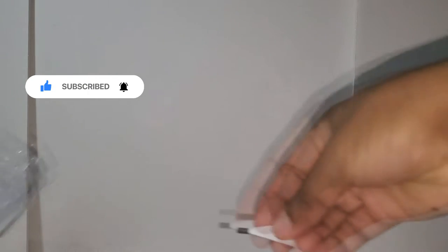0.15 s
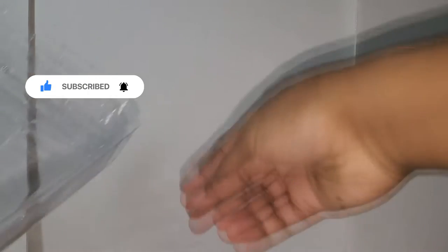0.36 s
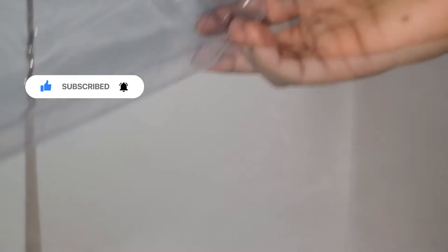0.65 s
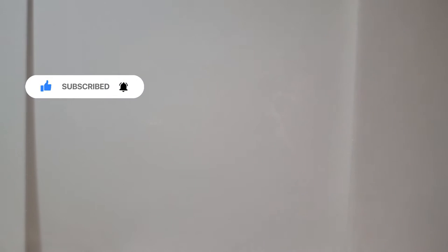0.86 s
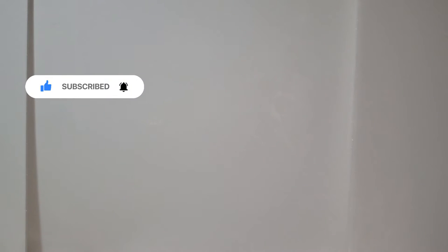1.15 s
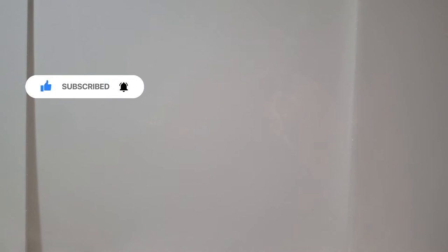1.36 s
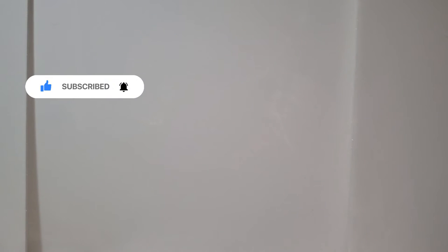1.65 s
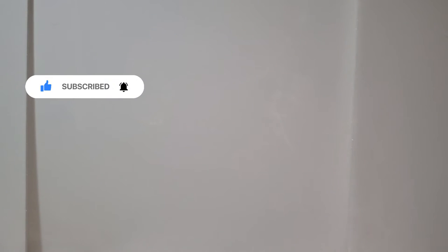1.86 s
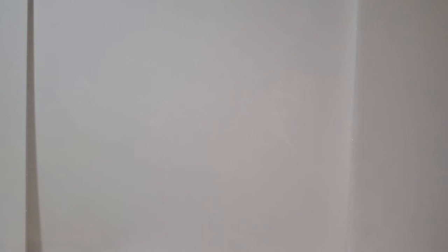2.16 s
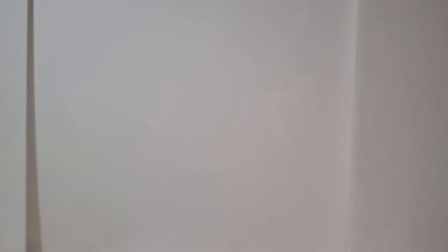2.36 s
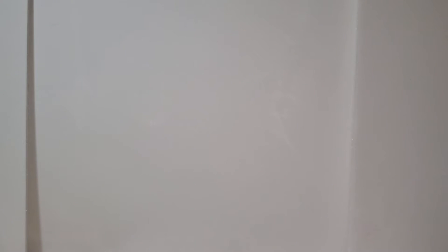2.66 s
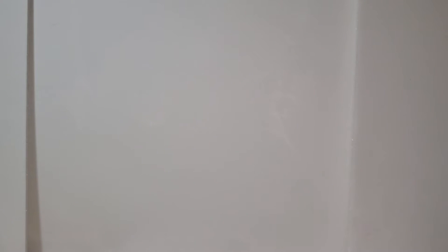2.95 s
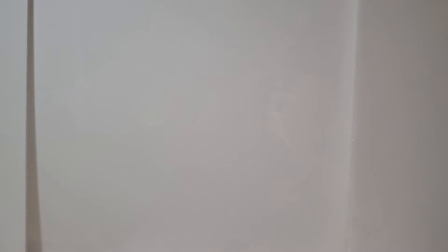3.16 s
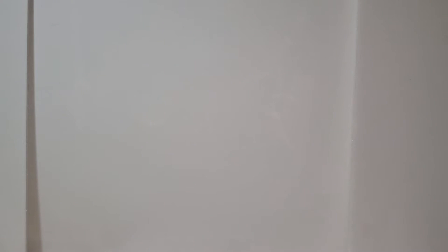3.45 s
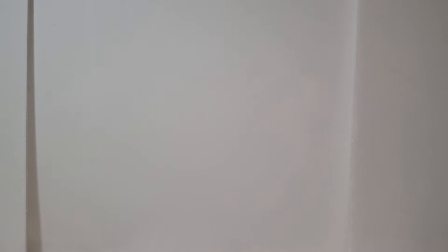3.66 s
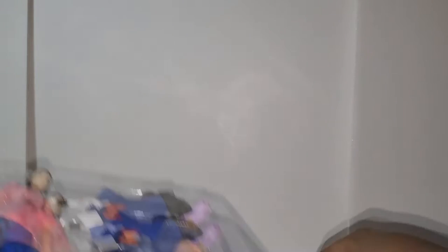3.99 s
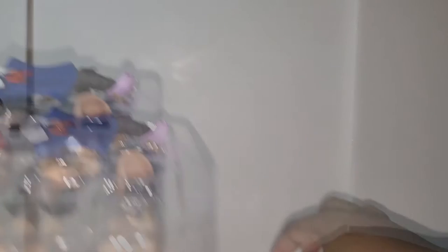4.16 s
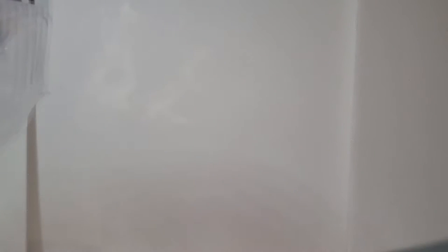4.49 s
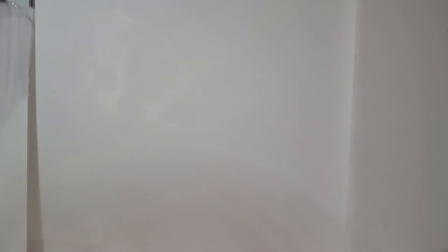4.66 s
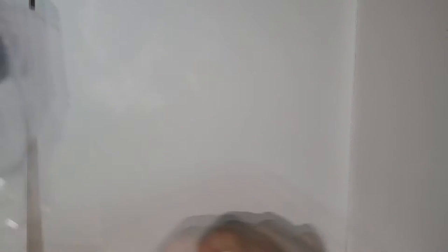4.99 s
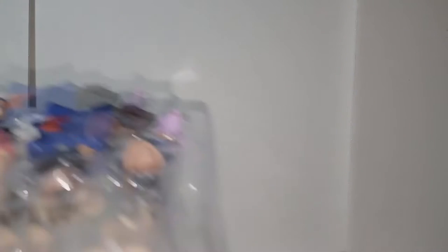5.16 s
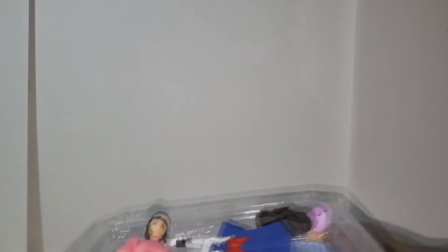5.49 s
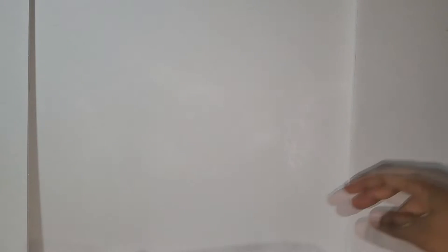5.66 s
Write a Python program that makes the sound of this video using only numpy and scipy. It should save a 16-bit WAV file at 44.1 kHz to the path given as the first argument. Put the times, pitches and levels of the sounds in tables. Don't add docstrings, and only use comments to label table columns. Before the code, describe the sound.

Thin hard plastic packaging cracks, pops and crinkles in bursts with quiet gaps, light tinkles and dull thumps, above an indoor hum.

```python
import sys
import numpy as np
from scipy import signal
from scipy.fft import rfft, irfft, next_fast_len
from scipy.io import wavfile
from scipy.ndimage import uniform_filter1d, map_coordinates

SR = 44100
rng = np.random.default_rng(int(sys.argv[2]) if len(sys.argv) > 2 else 0)


def master_out(mix):
    frames = np.transpose(np.atleast_2d(mix))
    ceiling = np.clip(frames, -1, 1)
    pcm = np.round(ceiling * 32767).astype(np.int16)
    wavfile.write(sys.argv[1], SR, pcm)


def invert_db(x):
    u = np.asarray(x, float) / 20
    return 10 ** u


N = 257103

# (low edge [Hz], high edge [Hz], t60 [s])
PARTS = [
    (2142, 5760, 0.049),
    (534, 1420, 0.047),
    (4900, 6700, 0.016),
    (137.7, 326, 0.051),
]
PART_LIKENESS = [
    0.066,
    0.81,
    0.047,
    0.92,
]


def unit(x):
    return x / np.sqrt(np.mean(x ** 2) + 1e-20)


def along(points, hz):
    f, v = np.transpose(points)
    return np.interp(np.log(hz + 1), np.log(f + 1), v)


def curves(rows):
    s, *cols = np.transpose(rows)
    return np.array([np.interp(np.arange(N) / SR, s, c) for c in cols])


def filtered(x, response):
    m = next_fast_len(N + 8192)
    hz = np.fft.rfftfreq(m, 1 / SR)
    return irfft(rfft(x, m) * response(hz), m)[..., :N]


def wobble(rate):
    knots = rng.standard_normal(int(N * rate / SR) + 4)
    return map_coordinates(knots, [np.arange(N) * rate / SR])


def ports(x, alike):
    turn = np.arccos(np.clip(alike, -1, 1)) / 2
    mid, side = x[0] * np.cos(turn), x[1] * np.sin(turn)
    return np.array([mid + side, mid - side])


def tray():
    drive = snaps() + clicks() + crumple()
    out = 0
    for d, (lo_hz, hi_hz, _) in zip(drive, PARTS):
        out = out + signal.fftconvolve(d, part_filter(lo_hz, hi_hz)[None], axes=1)[:, :N]
    return out


def snaps():
    # (time [s], peak level [dB], body over the peak [dB], length factor [1])
    rim_ticks = [(0.5805, -35.5, 2, 0.6), (0.7871, -24.5, 8, 1.2), (0.8, -12.5, -9.5, 0.69),
                 (0.9143, -44.5, 5, 1.2), (0.9353, -46, -2, 6.7), (1.0222, -31.5, 0, 0.5),
                 (1.0325, -29, -9, 0.64), (1.4364, -39, 4, 3.1), (1.444, -30.5, 9, 2.5),
                 (1.4582, -20, -6, 1.4), (1.6095, -28, 7.5, 1.65), (1.6885, -29.5, -6, 1.05),
                 (1.7185, -38, 4, 1.5), (1.733, -43.5, -3, 0.79), (1.4915, -45, -7, 1.1),
                 (1.7824, -53, 22, 1.26), (1.8193, -55, 11, 2.1), (2.0271, -46.5, 5.5, 2.1),
                 (2.0475, -23.5, -5, 1.1), (2.139, -30.5, -18, 1), (2.2118, -21.5, -17, 1.2),
                 (2.2626, -22.5, -1, 1.3), (2.272, -28, -5, 1.2), (2.39, -33, -1, 1), (2.43, -33, -12, 1.5),
                 (3.575, -28, -5, .8), (2.399, -40.5, -10, 1), (2.4605, -25, -2, 1.9),
                 (2.5075, -25.5, -17, 1.8), (3.5229, -25, -5, 1.9), (3.5324, -28, -13, 0.52),
                 (3.5922, -32, 7, 0.68), (3.6235, -26.5, -7, 0.9), (3.6385, -16, -1, 0.76),
                 (3.6474, -27.5, -8, 2.4), (4.0444, -44, 13, 0.4), (4.6124, -42.5, -12, 1.5),
                 (4.618, -55.5, -12, 1.1), (4.7915, -36.5, 1.5, 2.4), (5.2058, -29.5, -12, 0.52),
                 (5.2648, -24.5, -1, 0.86), (5.3372, -30.5, -15, 0.63), (5.3485, -35, -12, 1.9),
                 (5.4274, -35.5, 24, 0.52), (5.482, -36.5, -10, 0.49)]
    rib_cracks = [(0.3865, -5.5, -15, 0.24), (0.3905, -7.5, -16, 1.7), (0.4215, -2.5, -31, 0.56),
                  (0.6348, -51, 20.5, 2.3), (0.7401, -46, 14.5, 1.1), (0.7475, -34.5, 5, 0.52),
                  (0.8744, -52, 15, 1.3), (1.0214, -26, 2.5, 0.68), (1.0297, -19, -9.5, 0.41),
                  (1.4907, -31, 1.5, 1.9), (1.6317, -32, 5.5, 1.5), (1.716, -36, 8.5, 1.4),
                  (2.2744, -27.5, 11, 2.03), (2.5825, -24, -6.5, 1.6), (2.6305, -31.5, -3, 0.47),
                  (2.29, -26, 11, 1.44), (3.4865, -30.5, -8.5, 0.92), (3.516, -32, 10.5, 0.89),
                  (3.6012, -29.5, 6.5, 2.2), (3.628, -17.5, -5, 0.18), (3.7108, -24, -10, 0.44),
                  (3.7345, -22, 12, 0.48), (3.744, -16.5, 12, 1.44), (3.835, -39.5, 9, 0.85),
                  (4.041, -35.5, -3, 0.87), (4.108, -44, 6.5, 0.74), (4.1235, -37, -9, .8),
                  (4.0089, -31, -12, 1.4), (4.0764, -18.5, -19, 0.39), (4.079, -17, -4, 0.48),
                  (4.0892, -27, 3, 0.52), (4.8226, -45, -9, 1.46), (5.0669, -35, 7, 3.3),
                  (5.136, -31, -7, 0.94), (5.2923, -35.5, -6, 0.91), (5.392, -35, 6, 1),
                  (5.1811, -27, 2, 1.3), (5.2166, -16, -26, 0.54), (5.226, -16, -12, 1.1),
                  (5.235, -22, -4, 0.48), (5.245, -29.5, -5, 0.52), (5.378, -33, -16, 0.95),
                  (5.5151, -27, 11.5, 2.6), (5.5323, -22, 9, 1.44), (5.6435, -34.5, 15.5, 0.42),
                  (5.6481, -27.5, 7, 2), (5.711, -38, -5, 1), (5.7294, -30.5, -6, 0.81),
                  (5.743, -24, 0, 1.4)]
    face_pops = [(0.4325, -20, 1, 0.53), (0.4624, -31, 10.5, 3.2), (0.7996, -21, -3, 0.76),
                 (0.7785, -33.5, -5, 0.75), (1.5287, -35.5, 6.5, 2.5), (1.7549, -46, -6, 0.63),
                 (2.0345, -30.5, 12, 2.1), (2.168, -27, 11, 2.6), (2.3321, -39, -12, 1.5),
                 (2.377, -26, -6, 0.36), (2.4274, -46, -25, 2.7), (2.4483, -25.5, -8, 2.2),
                 (2.4605, -32, -48, 3.7), (3.5454, -27.5, 0, 0.84), (3.6765, -27.5, 7, 1.6),
                 (3.664, -29.5, 20, 2), (3.692, -40, 0, 0.66), (2.609, -25, 6, 1.6),
                 (2.5345, -30.5, 4, 2.1), (5.69, -32.5, 3, 0.63), (5.459, -31, -5, 0.67),
                 (5.766, -31, 7, 1.4), (5.81, -35, -1, 1.4), (5.3135, -37.5, 6, 1.7), (3.8562, -35, 0, 1.1),
                 (3.926, -37.5, 4.5, 0.69), (3.9766, -39.5, 8, 0.36), (4.6745, -41, 18, 1.47),
                 (4.7203, -43.5, 18, 2.6), (4.738, -50, 14, 1.5), (4.765, -56, 17.5, 2.4),
                 (4.78, -45.5, 12.5, 0.8), (5.1032, -30.5, -1, 2), (5.112, -31, 10.5, 2.2),
                 (5.16, -47, 8, 2.7), (5.442, -23.5, 16.5, 1.94), (5.6824, -30, 9, 1.5),
                 (5.7533, -23, 13, 2), (5.7872, -16.5, -17, 1.3), (5.797, -27.5, 2, 2.4)]
    kinds = ((rim_ticks, 1.5), (rib_cracks, -19), (face_pops, -28))
    rise_factor = (0.13, 4.4, 0.5, 6.4)
    crack_share = (1.0, 0.39, 0.6, 0.05)
    drive = np.zeros((4, 2, N + SR))
    t = np.arange(SR // 8) / SR
    noise = patchy(3)
    crack = 1.6 * invert_db(-60 * t / 0.011)
    for rows, edge_db in kinds:
        for s, db, body_db, length in rows:
            at = round(s * SR)
            piece = noise[:, at:at + len(t)]
            burst = piece / np.std(piece[:, :200])
            for k, rel_db in enumerate((0, body_db, edge_db, body_db - 11.0)):
                t60 = PARTS[k][2] * np.clip(length, 0.2, 4)
                fall = invert_db(db + rel_db - 9.0 - 60 * t / t60)
                rise_s = 0.00041 * length ** 2 * rise_factor[k]
                rise = 1 - np.exp(-(t + 1 / SR) / rise_s)
                envelope = (rise + crack * crack_share[k]) * fall
                drive[k, :, at:at + len(t)] += envelope * ports(burst, PART_LIKENESS[k])
    return drive[..., :N]


def clicks():
    # (time [s], level [dB])
    creases = [(0.385, -21), (0.3905, -15), (0.4216, -12), (0.424, -8), (5.7545, -13), (5.104, -24),
               (2.036, -17), (2.4645, -22), (0.8, -11), (1.0305, -20.5), (2.04, -27), (2.2635, -20),
               (2.0855, -29), (2.107, -28), (2.54, -32), (3.736, -29), (3.745, -21), (5.445, -23),
               (5.6495, -36), (5.767, -12.5), (5.4298, -21), (5.2495, -27), (1.4573, -23), (2.0467, -31.5),
               (2.093, -19), (2.1724, -22), (2.292, -24), (2.3044, -25), (2.379, -27.5), (2.452, -15),
               (2.512, -30), (2.585, -19), (2.2735, -17), (3.525, -34), (3.6245, -9), (3.639, -27),
               (5.1825, -15), (5.2063, -12), (5.2158, -9.5), (5.2656, -22), (5.4417, -16), (5.5385, -31),
               (5.6824, -28), (5.7875, -7)]
    over_click = [
        3.5,
        -11.5,
        -13,
    ]
    drive = np.zeros((4, 2, N))
    s, db = np.transpose(creases)
    at = np.round(s * SR).astype(int)
    drive[:3, :, at] = invert_db(db + np.array(over_click)[:, None])[:, None]
    return drive


def crumple():
    # (fullest at [s], crackle level [dB], build-up [s], hold [s], depth of the bend [dB])
    pinches = [(0.577, -65.5, 0.0015, 0.0035, 19), (0.796, -39.5, 0.0024, .004, 8),
               (1.022, -38, 0.016, 0.024, 2.5), (1.4565, -37.5, 0.001, 0.015, 2.5),
               (1.609, -45, .001, 0.007, -11), (1.705, -58, 0.039, 0.0089, 18.5),
               (2.03, -43, 0.005, 0.058, 8), (2.256, -34.5, 0.0018, 0.057, -2),
               (2.445, -36.5, 0.0028, 0.096, -1.5), (3.508, -43, 0.018, 0.025, -9),
               (3.646, -44, 0.034, 0.031, 12), (3.85, -62.5, 0.011, 0.11, 10),
               (4.074, -32.5, 0.003, 0.0019, 0), (4.622, -53, 0.024, 0.088, 5),
               (4.784, -64.5, 0.018, 0.015, 15), (5.223, -38, 0.0067, 0.0019, -4),
               (5.294, -52.5, 0.018, 0.094, 6), (5.505, -50, 0.017, 0.017, 18.5)]
    bends = [(0.386, -26, 0.0006, 0.0023, 13), (0.421, -37, 0.0024, .003, 18.5),
             (0.739, -54, 0.0018, 0.0036, 17), (2.075, -33, .04, 0.071, -10),
             (2.17, -36.5, 0.049, .05, -12), (2.231, -34.5, .02, 0.02, -13), (2.32, -33, .01, .02, -11),
             (2.35, -39, 0.028, 0.25, -0.5), (2.549, -36.5, 0.017, 0.088, -1),
             (3.485, -41, 0.0034, 0.022, -5.5), (3.702, -37.5, 0.11, 0.067, -2),
             (3.796, -41, 0.084, 0.024, 3.5), (4.009, -49, 0.01, 0.066, -2), (4.744, -49.5, 0.068, .02, 9),
             (5.107, -49.5, 0.069, 0.041, 9), (5.207, -39.5, 0.025, 0.0025, -10),
             (5.33, -53, 0.037, .07, 6.5), (5.44, -32.5, 0.04, 0.015, -1.5), (5.469, -37.5, .01, .02, -5),
             (5.59, -58, 0.033, 0.056, 18.5), (5.68, -48, 0.046, 0.0075, 18.5),
             (5.762, -28.5, 0.042, 0.017, 1), (5.788, -35, 0.01, 0.0073, 12), (5.82, -35, .01, .01, 0.5)]
    levels = [squeeze(*row, edge_db=10.5) for row in pinches]
    levels += [squeeze(*row, edge_db=-4) for row in bends]
    level = np.max(levels, axis=0)

    struck = rng.random((5, N)) < 800 / SR
    grains = struck * invert_db(np.minimum(2.5 * rng.exponential(1, (5, N)), 7))
    grain_s = 0.0017
    swell = signal.lfilter([1], [1, -np.exp(-1 / (grain_s * SR))], grains[0] + 1.9 * grains[1:])
    swell[3] = uniform_filter1d(swell[3], size=SR // 30)
    noise = patchy(2.5)[:, :N]
    out = []
    for db, g, alike in zip(level, swell, PART_LIKENESS):
        out.append(invert_db(db - 2.0) * unit(0.26 + unit(g)) * ports(noise, alike))
    return np.array(out)


def squeeze(s, db, build_s, hold_s, depth_db, edge_db):
    # (level over a medium crackle [dB], share of the bend's depth [1], slope [dB per dB of crackle])
    follow = [
        (-0.5, 0.85, 0.454),
        (-11.5, 0.15, -0.1367),
        (1, 0.18, -0.2835),
    ]
    build_db, rest_db, settle_s, medium_db = 12, -81.5, 0.1, -45
    t = np.arange(N) / SR - s
    fall = rest_db + (db - rest_db) * np.exp(-np.maximum(t - hold_s, 0) / settle_s)
    build = build_db * np.minimum(t, 0) / max(build_s, 1 / SR)
    level = np.maximum(fall + build, rest_db)
    body, edge, thud = [level + over + share * depth_db + slope * (level - medium_db)
                        for over, share, slope in follow]
    active = (t > -build_s) & (t < hold_s + 2 * settle_s)
    return np.where(active, [level, body, edge + edge_db, thud], -150)


def patchy(depth_db):
    z = signal.stft(rng.standard_normal((2, N + SR)), nperseg=512)[2]
    field = rng.standard_normal(z.shape[1:])
    for axis in (0, 1):
        field = uniform_filter1d(field, size=3, axis=axis)
    return unit(signal.istft(z * invert_db(depth_db * unit(field)), nperseg=512)[1])


def part_filter(lo_hz, hi_hz):
    # (frequency [Hz], level per Hz [dB])
    sheet_colour = [(76, -28.5), (130, -7.5), (238, 2), (378, -0.5), (706, 0), (1190, -5.5), (1290, -6.5),
                    (1460, 1), (7150, -14.5), (9670, -9), (16000, -14)]
    # (centre [Hz], width [Hz], level [dB])
    panels = [(640, 9.9, 3.5), (795, 26, 3.5), (1170, 420, 7), (1445, 42, -1), (2320, 30, -6),
              (3210, 200, 2.5), (3833, 150, 3.5)]
    hz = np.fft.rfftfreq(4096, 1 / SR)
    colour_db = along(sheet_colour, hz)
    for centre_hz, width_hz, db in panels:
        colour_db = colour_db + db / (1 + (2 * (hz - centre_hz) / width_hz) ** 2)
    band = np.sqrt((1 + (lo_hz / (hz + 1)) ** 6) * (1 + (hz / hi_hz) ** 6))
    cep = irfft(np.log(invert_db(colour_db) / band + 1e-6))
    cep[1:2048] *= 2
    cep[2049:] = 0
    h = irfft(np.exp(rfft(cep)))[:2048]
    return h / np.linalg.norm(h)


def tinkle():
    # (time [s], peak level [dB])
    knocks = [(4.728, -33), (4.7431, -24.5), (4.7761, -36), (4.801, -38)]
    # (frequency [Hz], level [dB], t60 [s])
    modes = [(3910, -4.5, 0.061), (5140, -14, 0.038), (2250, -29, 0.035), (7600, -45, 0.03)]
    # (time [s], frequency [Hz], level [dB], t60 [s])
    second_part = [(0.035, 1150, -43, 0.046), (4.613, 5750, -35, 0.04), (4.616, 4900, -38, .02),
                   (4.638, 5750, -43, .04), (4.679, 3750, -49, .05), (4.722, 3350, -47, .05),
                   (4.614, 800, -44, .08), (4.618, 10300, -37, 0.03), (4.614, 2140, -37, 0.04),
                   (4.724, 4800, -43, .05), (4.742, 5700, -43, .03), (4.742, 7300, -48, .05),
                   (4.822, 5350, -45, 0.04)]
    face_rings = [(0.3895, 1070, -7, 0.047), (0.3895, 602, -17, 0.078), (0.398, 1188, -15, 0.063),
                  (0.4215, 1420, -18, 0.026), (0.431, 1140, -11.5, 0.028), (0.46, 606, -30, 0.079),
                  (0.8003, 4140, -16, 0.008), (3.547, 3440, -27, 0.013), (5.483, 3917, -33.5, .015),
                  (0.8003, 4970, -12, .01), (0.7993, 6460, -18, 0.0075), (1.458, 1267, -26, 0.026),
                  (1.458, 8700, -28, 0.022), (2.036, 1178, -20, 0.039), (2.155, 2270, -35, 0.05),
                  (2.6523, 3330, -36, .03), (3.74, 1174, -24, 0.11), (4.0765, 999, -11.5, 0.008),
                  (4.7927, 10060, -48, 0.074), (5.222, 3210, -17.5, 0.018), (5.312, 790, -37.5, 0.05),
                  (5.378, 680, -36.5, 0.099), (5.412, 795, -32, 0.11), (5.442, 1570, -10, 0.0098),
                  (5.5596, 1720, -26, 0.016), (5.683, 1820, -11.5, 0.0062), (5.765, 710, -14.5, 0.035),
                  (5.823, 2200, -14, 0.0085)]
    out, t = np.zeros(N + SR), np.arange(SR // 5) / SR
    rings = [(s, hz, db + level, t60) for s, db in knocks for hz, level, t60 in modes]
    for s, hz, db, t60 in rings + second_part + face_rings:
        envelope = invert_db(db + 2.5 - 60 * t / t60) * (1 - np.exp(-t / 0.0006))
        out[round(s * SR):][:len(t)] += envelope * np.sin(2 * np.pi * hz * t)
    return out[:N]


def thumps():
    # (time [s], peak level [dB], frequency [Hz], t60 [s])
    table_hits = [(0.806, -29, 169, 0.37), (1.022, -33, 684, 0.14), (1.025, -30.5, 900, 0.087),
                  (1.486, -32.5, 309, 0.069), (2.263, -32, 338, 0.2), (2.285, -30, 567, 0.069),
                  (2.59, -28.5, 201, 0.081), (3.28, -35.5, 296, 0.17), (3.746, -15, 230, 0.043),
                  (4.075, -17.5, 256.6, 0.082), (4.395, -29, 250, 0.085), (4.68, -50, 776, 0.099),
                  (4.72, -33.5, 418, 0.08), (4.725, -27.5, 573, 0.039), (4.677, -37, 500, 0.033),
                  (4.768, -36, 690, .05), (5.755, -12, 185, 0.034)]
    out, t = np.zeros(N + SR), np.arange(SR // 4) / SR
    for s, db, hz, t60 in table_hits:
        envelope = invert_db(db - 60 * t / t60) * (1 - np.exp(-t / 0.00062))
        out[round(s * SR):][:len(t)] += envelope * np.sin(2 * np.pi * hz * t)
    return out[:N]


def placed(x):
    # (time [s], distance nearer to the left port [cm])
    path = [(0.45, 4.7), (.55, 7.8), (.8, 6.2), (1.02, 0), (1.5, 3.1), (1.62, 8.6), (2.0, 13), (2.7, 12.5),
            (3.45, -3.9), (3.64, -3.9), (3.74, 5.5), (3.86, 5.5), (3.93, -1.6), (4.1, -1.6), (4.65, 9.4),
            (5.12, 10), (5.18, -.8), (5.83, 0)]
    cm, = curves(path)
    lead = cm / 34300 * SR
    pan_db = 1 + 0.135 * cm
    n = np.arange(N)
    return np.array([invert_db(sign * pan_db) * map_coordinates(ch, [n + sign * lead / 2])
                     for ch, sign in zip(x, (1, -1))])


def room(x):
    # (frequency [Hz], t60 [s])
    decay = [(200, 0.18), (900, 0.09), (2200, 0.16), (5000, 0.15), (12000, 0.06)]
    hz, t, z = signal.stft(rng.standard_normal((2, SR // 2)), SR, nperseg=256)
    tail = signal.istft(z * invert_db(-60 * t / along(decay, hz)[:, None]), SR, nperseg=256)[1]
    delayed = np.pad(x, ((0, 0), (200, 0)))
    return signal.fftconvolve(delayed, tail / np.linalg.norm(tail[0]), axes=1)[:, :N]


def background():
    return hum() + rumble() + hiss()


def hum():
    # (time [s], level [dB])
    loudness = [(0.0, -46.5), (0.42, -34.5), (0.76, -33.5), (1.0, -32), (1.36, -39), (1.67, -30),
                (2.05, -35), (2.27, -34), (2.48, -32.5), (2.75, -43.5), (2.9, -35), (3.57, -42.5),
                (3.67, -29), (3.88, -41), (4.11, -30.5), (5.24, -32), (5.55, -29.5), (5.75, -42)]
    # (frequency [Hz], wander [Hz], level [dB])
    harmonics = [(59, 2, 0), (118, 3, -9), (176, 5, -17)]
    hum_db, = curves(loudness)
    tone = 0
    for hz, wander_hz, db in harmonics:
        phase = 2 * np.pi * np.cumsum(hz + wander_hz * wobble(22)) / SR
        tone = tone + invert_db(db + 1.2 * wobble(22)) * np.sin(phase)
    return invert_db(hum_db - 6.0) * unit(tone)


def rumble():
    # (frequency [Hz], level per Hz [dB])
    rumble_colour = [(15, -67.5), (25, -39.5), (43, -6), (65, 0), (86, -6.5), (112, -16), (210, -17.5),
                     (323, -29), (880, -40), (1070, -47), (1700, -55), (3000, -63), (6000, -100)]
    # (frequency [Hz], left-right likeness [0..1])
    likeness = [(60, 0.97), (240, 0.93), (950, 0.19), (3770, 0.19), (15000, 0.33)]
    # (time [s], level [dB])
    jolts = [(1.67, -45), (2.271, -37.5), (2.481, -36.5), (3.672, -34.5), (5.63, -52), (5.78, -35.5)]
    rest_db, half_jolt_s = -42.5, 0.06
    t = np.arange(N) / SR
    shake = invert_db(rest_db) + sum(invert_db(db) * np.exp(-((t - s) / half_jolt_s) ** 2) for s, db in jolts)

    def response(hz):
        turn = np.arccos(np.clip(along(likeness, hz), -1, 1)) / 2
        away = 1 - 0.7 / (1 + ((hz - 59) / 12) ** 4)
        return invert_db(along(rumble_colour, hz)) * away * [np.cos(turn), np.sin(turn)]

    mid, side = filtered(rng.standard_normal((2, N)), response)
    return shake * unit(np.array([mid + side, mid - side]))


def hiss():
    # (frequency [Hz], level per Hz [dB])
    hiss_colour = [(1500, -14), (2200, -4), (4000, 4), (6500, 0), (9500, 3), (13000, 0), (16000, -2)]
    noise = filtered(rng.standard_normal((2, N)), lambda hz: invert_db(along(hiss_colour, hz)))
    return invert_db(-75 + wobble(3)) * unit(noise)


def scene():
    sheet = placed(tray())
    parts = placed(np.tile(tinkle(), (2, 1)))
    echo = room(invert_db(-12.5) * sheet + invert_db(-18.5) * parts)
    return sheet + parts + thumps() + echo + background()


def band_limit(x):
    return signal.sosfilt(signal.butter(12, 16400, fs=SR, output="sos"), x)


def record(dry):
    limited = dry / (1 + np.abs(dry) ** 8) ** (1 / 8)
    mix = filtered(limited, lambda hz: hz < 16350)
    return band_limit(mix)


dry = scene()
out = record(dry)
master_out(out)
```